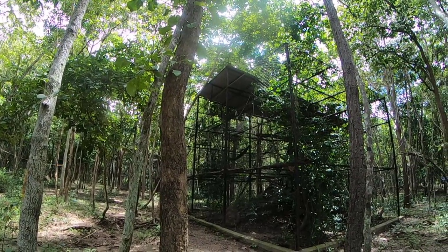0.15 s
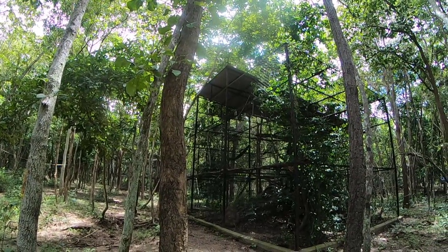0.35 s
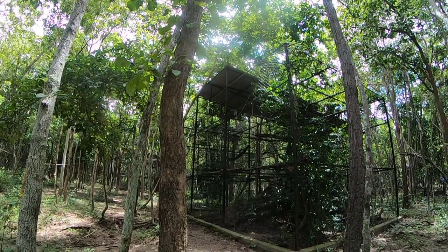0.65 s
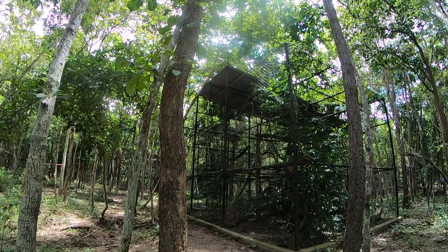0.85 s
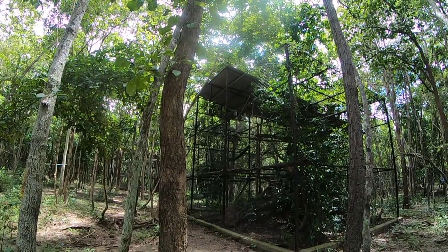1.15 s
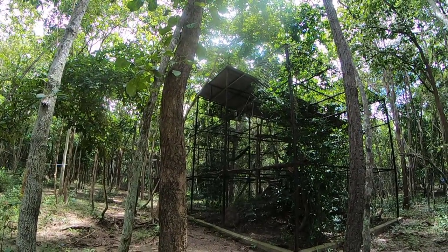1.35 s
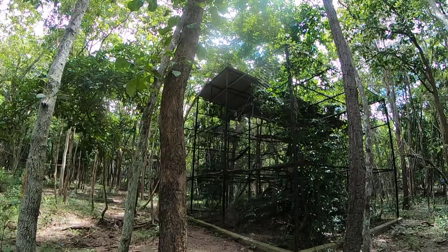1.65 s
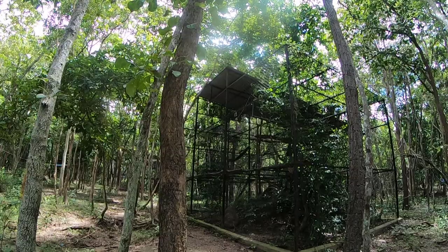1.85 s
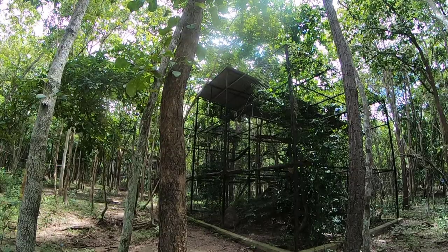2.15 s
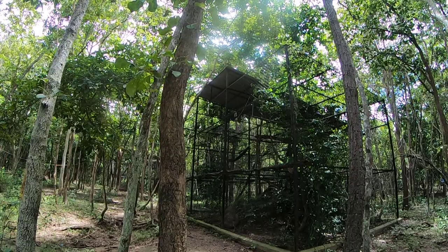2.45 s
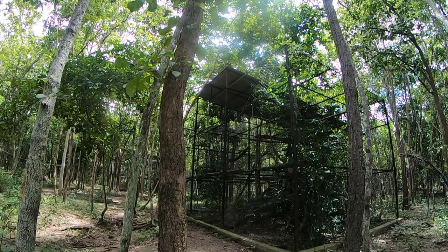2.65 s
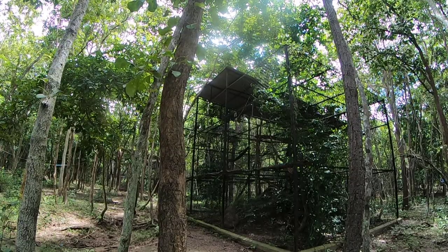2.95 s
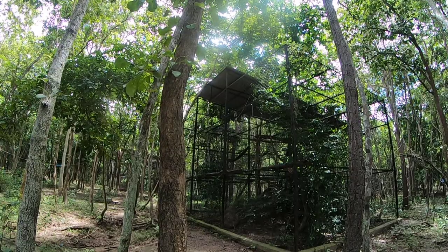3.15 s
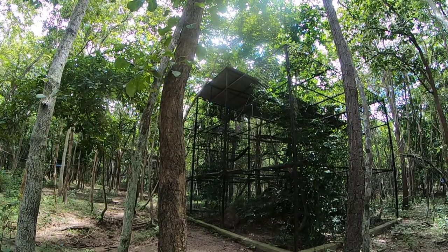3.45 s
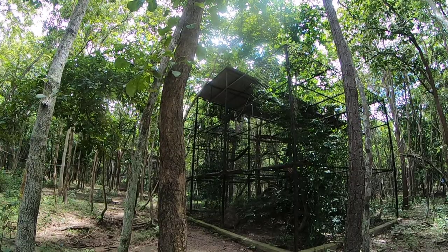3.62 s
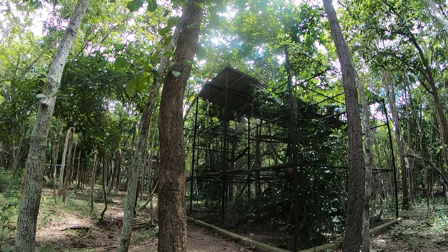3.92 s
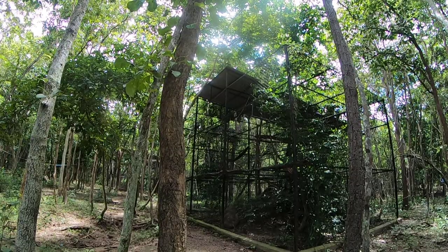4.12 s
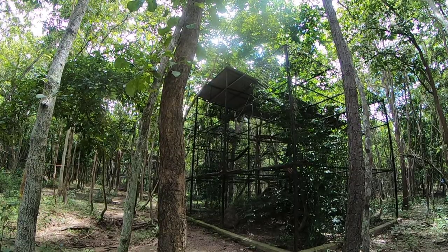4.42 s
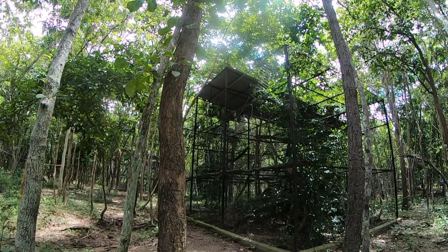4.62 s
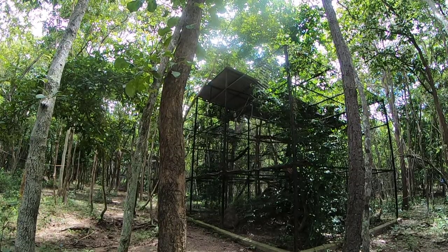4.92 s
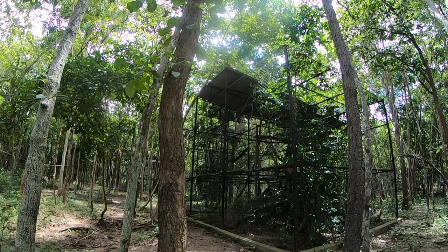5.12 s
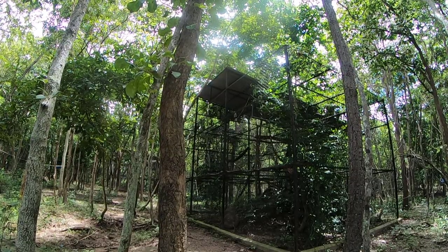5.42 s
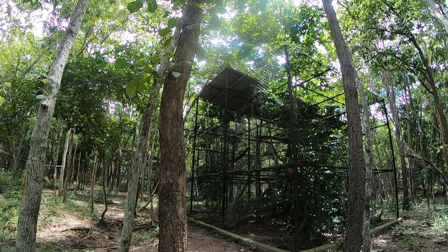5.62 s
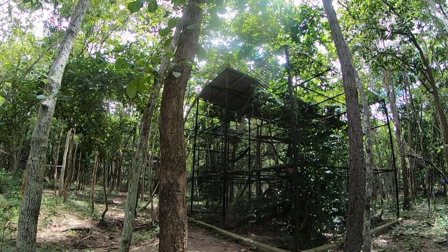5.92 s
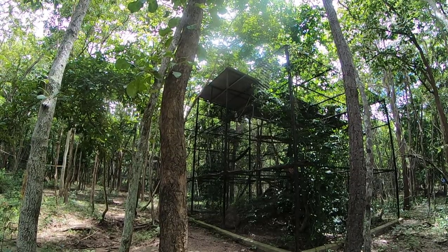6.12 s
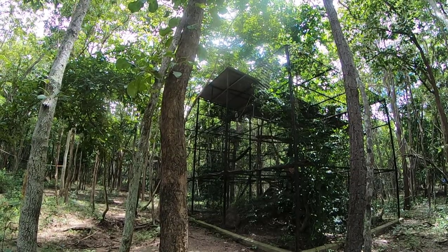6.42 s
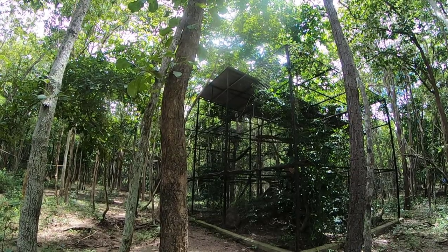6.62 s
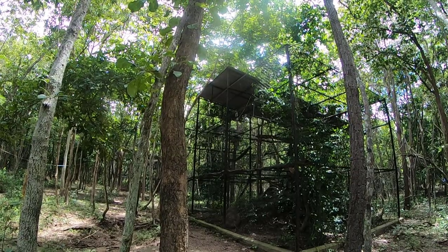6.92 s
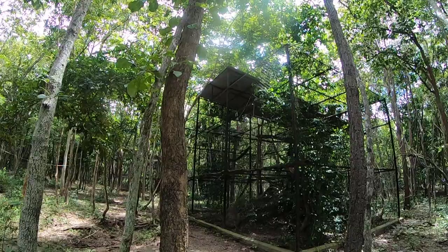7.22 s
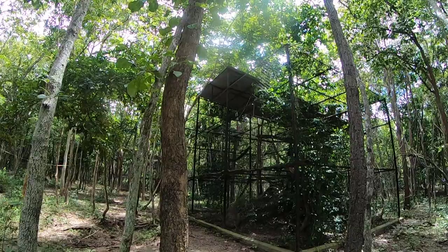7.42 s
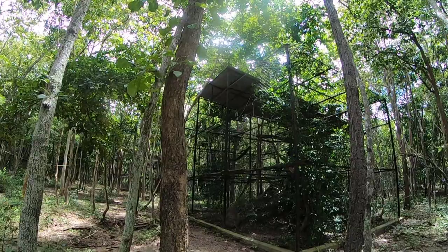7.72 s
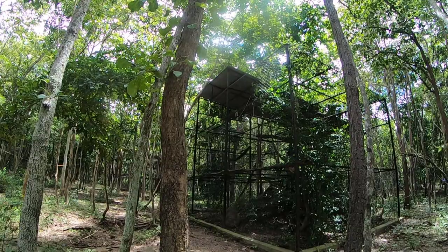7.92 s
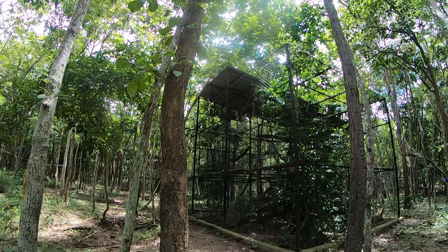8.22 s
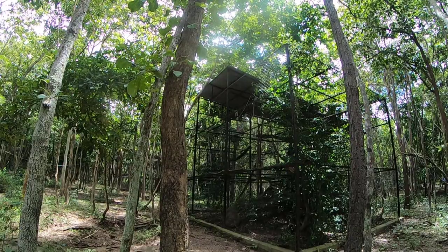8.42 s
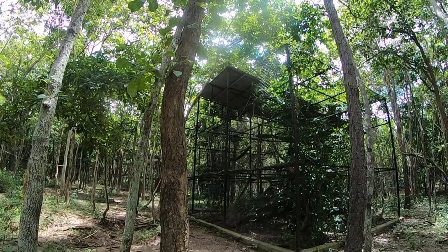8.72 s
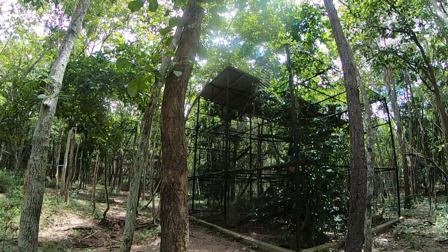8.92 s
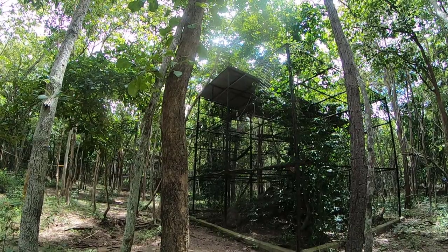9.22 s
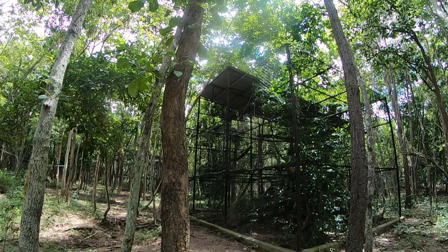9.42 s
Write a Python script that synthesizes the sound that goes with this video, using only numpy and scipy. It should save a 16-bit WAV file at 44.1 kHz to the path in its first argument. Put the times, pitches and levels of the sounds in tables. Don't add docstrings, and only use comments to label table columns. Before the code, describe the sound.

A gibbon's rapid bubbling whoops break into loud pure hoots and swoops in a forest, others answering, then sparse distant hoots over soft hiss.

```python
import sys
import numpy as np
from scipy import signal
from scipy.fft import rfft, irfft, next_fast_len
from scipy.io import wavfile
from scipy.ndimage import uniform_filter1d, minimum_filter1d

SR = 44100
rng = np.random.default_rng(int(sys.argv[2]) if len(sys.argv) > 2 else 0)


def dump(signal):
    limited = np.clip(np.atleast_2d(signal).T, -1, 1)
    pcm = np.round(limited * 32767).astype(np.int16)
    wavfile.write(sys.argv[1], SR, pcm)


def nominal_scale(level):
    x = np.asarray(level, float) / 20
    return 10 ** x


N = 421596
LEAD_IN = 30000
NEAR_LEFT_LEAD_S, FAR_LEFT_LEAD_S = 0.00003, 0.00025

# peak_s, peak_db, pitch_hz
NEAR_TRILL = [(0.02, -1.5, 772.6), (0.101, -2, 788.4), (0.181, -1, 788), (0.267, -3.5, 764.4),
              (0.351, -3, 765), (0.436, -3, 761.7), (0.522, -4, 779), (0.609, -18.5, 847),
              (0.752, -14.5, 817)]
# from_onset_s, pitch_ratio, level_db
NEAR_WHOOP = [(-.022, .58, -40), (-.007, .82, -28), (.001, .92, -7), (.008, 1.01, -1), (.015, 1.1, -6),
              (.022, 1.2, -20), (.032, 1.33, -36)]
NEAR_TRILL_VOICE = (-4.5, -19.5, -43, -2, -8.5)


def near_trill(place, breath):
    period_s = 0.064
    first_s, *first = NEAR_TRILL[0]
    earlier = [(first_s - k * period_s, *first) for k in range(1, 8)]
    sing_trill(place, earlier + NEAR_TRILL, NEAR_WHOOP, NEAR_TRILL_VOICE, breath)


# length_share, pitch_ratio, level_db
NEAR_ARCH = [(0, .77, -9), (.23, .955, -1), (.5, .99, -2), (.68, 1, -.5), (.82, .96, 2.5), (1, .75, -12)]
WIDE_ARCH = [(0, .51, -32.5), (.2, .75, -10.5), (0.382, .91, 1.5), (0.619, 1.0, -4), (.8, .9, 4.5),
             (.94, .73, -10.5), (0.998, .49, -15)]
SWOOP = [(0, .73, -22), (.13, .955, -2.5), (.32, 1, 1.5), (.53, .925, -1.5), (.69, .83, -9),
         (.83, .52, -41), (1, .37, -47)]
RISE = [(0, .76, -27.5), (.25, .91, -6.5), (.6, 1.002, .6), (1, .985, -6.5)]
HELD = [(0, .82, -26), (.09, .99, -.5), (.45, 1.01, 1), (.7, .955, -3.5), (.79, .99, -6), (.89, 1.15, -9),
        (1, 1.27, -9)]
# start_s, length_s, pitch_hz, level_db, swell_db
NEAR_ARCHES = [(.64, 0.09, 1277, -14, -4), (.81, 0.097, 1271, -14, 7), (1.188, 0.16, 1325, -14, 4.2),
               (1.93, .136, 1329, -12.5, 0.8), (2.645, 0.13, 1283, -11.5, 3.1)]
CLIMAX = [(3.695, .17, 1353, -10.5, .5)]
SWOOPS = [(1.627, .225, 912, -8.5, 6.5), (2.3, 0.21, 908, -7, 2), (3.087, .18, 899.3, -8, -2.5)]
NEAR_RISES = [(1.975, .115, 861, -17.5, 12)]
NEAR_HELD = [(.925, .225, 806.5, -5, -5)]
NEAR_HIGH_VOICE = (-9, -13.5, -25, -6.5, 7)
NEAR_LOW_VOICE = (-5, -10, -28, -5.5, 3)
NEAR_RISE_VOICE = (-4, -29.5, -27, -4.5, -0.5)
NEAR_HELD_VOICE = (-3, -13.5, -38, -8.5, -2)


def near_hoots(place, breath):
    sing_notes(place, NEAR_ARCHES, NEAR_ARCH, NEAR_HIGH_VOICE, breath)
    sing_notes(place, CLIMAX, WIDE_ARCH, NEAR_HIGH_VOICE, breath)
    sing_notes(place, SWOOPS, SWOOP, NEAR_LOW_VOICE, breath)
    sing_notes(place, NEAR_RISES, RISE, NEAR_RISE_VOICE, breath)
    sing_notes(place, NEAR_HELD, HELD, NEAR_HELD_VOICE, breath)


# length_share, pitch_ratio, level_db
FAR_ARCH = [(0, .85, -42), (.26, .985, -3.5), (.52, 1, .5), (.74, .95, 0), (.86, .87, -11), (1, .73, -34)]
WAVER = [(0, .91, -13), (.3, 1.01, .5), (.62, .97, -.5), (1, 1.025, -5)]
SAG = [(0, .89, -13), (.22, 1, -.5), (.6, .975, .5), (.82, .935, -1.5), (1, .92, -8)]
UPTURN = [(0, .94, -32), (.14, 1, -3.5), (.55, .99, 0), (.78, 1.03, .5), (1, 1.09, -16)]
# start_s, length_s, pitch_hz, level_db, swell_db
FAR_ARCHES = [(0.036, 0.068, 1392, -24.5, -3), (2.955, 0.13, 1449, -12, -0.5),
              (3.665, 0.19, 1436, -17, 5.5)]
WAVERS = [(.37, .15, 905, -21, -1.8), (2.125, 0.13, 998, -15, 2.5), (2.71, .125, 1019, -14, -2)]
SAGS = [(1.46, 0.16, 869, -25, 6.5), (1.515, .135, 981, -17.5, 5), (3.33, .19, 983.4, -16.5, -2.5)]
CLOSING_ARCHES = [(5.891, .125, 1445, -13, 9), (7.045, .145, 1400, -12.5, -2),
                  (8.225, .14, 1413, -11.5, 2.5)]
FAR_RISES = [(4.61, .11, 1293, -18.5, -12.5)]
FAR_HELD = [(.64, .23, 861, -16, 2.5)]
UPTURNS = [(6.585, .176, 767.6, -23.5, 7.7), (7.655, .176, 799.8, -23.5, 3.5)]
FAR_HIGH_VOICE = (6.5, -15.5, -38.5, -2.5, 1.5)
FAR_LOW_VOICE = (6.5, -21.5, -43, -1, 5)
CLOSING_VOICE = (11.5, -19.5, -42.5, -8.5, 0.5)
ASIDE_VOICE = (24, -34, -46.5, -6.5, -7)
FAR_HELD_VOICE = (12.5, -18.5, -32, -8, 0.3)
UPTURN_VOICE = (7, -23.5, -45.5, 2, -0.5)


def far_hoots(place, breath):
    sing_notes(place, FAR_ARCHES, FAR_ARCH, FAR_HIGH_VOICE, breath)
    sing_notes(place, WAVERS, WAVER, FAR_LOW_VOICE, breath)
    sing_notes(place, SAGS, SAG, FAR_LOW_VOICE, breath)
    sing_notes(place, CLOSING_ARCHES, FAR_ARCH, CLOSING_VOICE, breath)
    sing_notes(place, FAR_RISES, RISE, ASIDE_VOICE, breath)
    sing_notes(place, FAR_HELD, HELD, FAR_HELD_VOICE, breath)
    sing_notes(place, UPTURNS, UPTURN, UPTURN_VOICE, breath, bend_per_db=0.19)


# peak_s, peak_db, pitch_hz
FAR_TRILL = [(4.016, -31, 887), (4.136, -13, 829), (4.244, -20, 714), (4.335, -14, 824), (4.42, -11.5, 820),
             (4.507, -14, 821.4), (4.593, -16, 830), (4.685, -21, 789.5), (4.765, -27, 823),
             (4.852, -18, 780.6), (4.94, -14.5, 844), (5.03, -11.5, 826), (5.121, -15, 841),
             (5.203, -14.5, 788), (5.304, -18.5, 786), (5.389, -24, 779.7)]
# from_onset_s, pitch_ratio, level_db
FAR_WHOOP = [(-.026, .66, -27), (-.014, .77, -15), (-.002, .91, -11), (.004, 1.0, 1), (.01, 1.07, -9),
             (.02, 1.2, -22)]
FAR_TRILL_VOICE = (8.5, -26, -40.5, 4.5, -8)


def far_trill(place, breath):
    sing_trill(place, FAR_TRILL, FAR_WHOOP, FAR_TRILL_VOICE, breath)


# start_s, length_s, pitch_hz, level_db, swell_db
CRIES = [
    (1.06, 0.13, 1706, -19.5, 3),
    (1.79, 0.19, 1630, -16.5, .5),
    (2.41, .17, 1663, -13.5, 2.4),
]
# length_share, pitch_ratio, level_db
DROOP = [(0, .9, -18), (.2, .995, -12), (.4, .985, -3), (.65, .925, 1.5), (.83, .855, 4.5), (1, .775, -6)]
CRY_VOICE = (3, -19, -44, -8, -6)


def young_cries(place, breath):
    sing_notes(place, CRIES, DROOP, CRY_VOICE, breath)


# start_s, length_s, from_hz, to_hz, level_db
MURMURS = [(.7, 0.091, 648, 668, -42), (1.25, .16, 285, 280, -61), (3.075, 0.21, 539, 400, -53.5),
           (3.865, 0.033, 610, 433, -49.5), (6.785, 0.032, 1240, 1060, -44), (7.81, .06, 677, 400, -53)]
MURMUR_VOICE = (1.5, -17.5, -35.5, -11.5, -3)


def murmurs(place, breath):
    for start_s, length_s, from_hz, to_hz, level_db in MURMURS:
        edge_db = level_db - 4.5
        rows = [(start_s, from_hz, edge_db),
                (start_s + length_s / 2, (from_hz + to_hz) / 2, level_db),
                (start_s + length_s, to_hz, edge_db)]
        sing(place, rows, MURMUR_VOICE, breath)


def sing_trill(place, pulses, whoop, voice, breath):
    for peak_s, peak_db, pitch_hz in pulses:
        rows = [(peak_s + from_s, pitch_hz * ratio, peak_db + db) for from_s, ratio, db in whoop]
        sing(place, rows, voice, breath)


def sing_notes(place, events, shape, voice, breath, bend_per_db=None):
    for start_s, length_s, pitch_hz, level_db, swell_db in events:
        bend = bend_per_db * swell_db if bend_per_db else 1
        rows = [(start_s + share * length_s, pitch_hz * ratio ** bend, level_db + db + swell_db * (share - 0.5))
                for share, ratio, db in sorted(shape)]
        sing(place, rows, voice, breath)


# frequency_hz, near_db, far_db
MOUTH = [(1270, -3.5, 8.5), (1780, -0.3, -2.8), (1920, 3.9, 5.5), (2466, 1.6, 10.5), (2950, -9, -8.5),
         (3330, 2.5, -4), (4000, -9, 1.3)]
# frequency_hz, near_db, far_db
UPPER = [(2000, -37.5, -48.5), (3700, -40.5, -47), (3920, -54, -32.5), (4540, -53.5, -50.5),
         (6300, -46, -40), (6570, -53.5, -46.5), (7860, -64, -63.5), (9600, -69, -64), (11000, -84, -80.5)]


def sing(place, rows, voice, breath):
    left_right_db, second_db, third_db, scatter_db, upper_db = voice
    s, hz, db = np.transpose(rows)
    at = np.arange(round((s[0] - 0.008) * SR), round((s[-1] + 0.01) * SR))
    t = at / SR
    pitch_hz = rounded(np.interp(t, s, hz), min(len(t) // 8, 600))
    edge = np.clip(np.minimum(t - t[0], t[-1] - t) / 0.012, 0, 1)
    level = rounded(nominal_scale(np.interp(t, s, db)), min(len(t) // 20, 350)) * edge ** 2
    phase = 2 * np.pi * np.cumsum(pitch_hz) / SR
    singer_column = 2 if left_right_db > 0 else 1

    overtones = 0
    for k, harmonic_db in ((2, second_db), (3, third_db)):
        mouth_db = at_hz(MOUTH, k * pitch_hz, singer_column)
        overtones = overtones + nominal_scale(harmonic_db + mouth_db) * np.sin(k * phase)
    for k in range(4, 14):
        level_k = nominal_scale(upper_db + at_hz(UPPER, k * pitch_hz, singer_column))
        overtones = overtones + level_k * np.sin(k * phase + k * k) * (k * pitch_hz < 12000)
    flutter_db, flutter_per_s = 4, 70
    overtones = overtones * nominal_scale(flutter_db * drift(len(t), flutter_per_s))

    full_turn_drop, dull_db, turned_scatter_db = 0.1, 3, 2.5
    pitch_drop = 1 - pitch_hz / np.maximum.accumulate(pitch_hz)
    turn = np.minimum(pitch_drop / full_turn_drop, 1)
    core = np.sin(phase) + nominal_scale(-40.5) * breath[at + LEAD_IN]
    direct = level * (core + overtones * nominal_scale(-dull_db * turn))
    scatter = level * (core + overtones) * nominal_scale(scatter_db + turned_scatter_db * turn)
    left_power = 1 / (1 + nominal_scale(-2 * left_right_db))
    feeds = np.array([np.sqrt(left_power) * direct, np.sqrt(1 - left_power) * direct, scatter])
    place[:, at + LEAD_IN] += np.sqrt(2) * feeds


# frequency_hz, density_db
BREATH = [(300, -20.5), (900, -7), (2000, -3.5), (4000, -12.5), (7000, -30.5), (11000, -41.5)]


def breath_noise():
    return coloured(rng.standard_normal(next_fast_len(N + LEAD_IN)), BREATH)


# frequency_hz, t60_s, level_db
TREES = [(400, 1.065, 3.5), (835, 1.016, 1.5), (1400, 1.017, 5.5), (2400, 0.81, 10), (4200, 0.93, 8),
         (8750, 0.11, 11)]


def trees():
    t = np.arange(int(1.4 * SR)) / SR
    build_up_s, shared = 0.0033, 0.29
    white, out = rng.standard_normal((2, len(t))), 0
    white[1] = shared * white[0] + np.sqrt(1 - shared ** 2) * white[1]
    edges_hz = 250 * 2 ** np.arange(0, 6, 2 / 3)
    for low_hz, high_hz in zip(edges_hz, edges_hz[1:]):
        band = signal.sosfilt(signal.butter(2, [low_hz, high_hz], "band", fs=SR, output="sos"), white)
        center_hz = np.sqrt(low_hz * high_hz)
        t60_s = at_hz(TREES, center_hz)
        decay_db = at_hz(TREES, center_hz, column=2) - 60 * t / t60_s
        out = out + band * nominal_scale(decay_db) / np.sqrt(t60_s * SR / 14)
    return out * (1 - np.exp(-t / build_up_s))


def with_echo(response):
    delay_s, blur_s, left_db, right_db = 0.035, 0.05, 3.5, -2.5
    t = np.arange(response.shape[1]) / SR
    envelope = np.exp(-((t - delay_s) / blur_s) ** 2) / np.sqrt(blur_s * SR)
    burst = rng.standard_normal(len(t)) * envelope
    return response + np.outer(nominal_scale([left_db, right_db]), burst)


def heard(place, response, left_lead_s):
    size = next_fast_len(place.shape[1] + response.shape[1])
    hz = np.fft.rfftfreq(size, 1 / SR)
    sound = rfft(place[:2], size) + rfft(place[2], size) * rfft(response, size)
    delay = np.exp(-2j * np.pi * np.outer([0, left_lead_s], hz))
    return irfft(sound * delay, size)[:, LEAD_IN:LEAD_IN + N]


# start_s, peak_db, pitch_hz, left_right_db, t60_s
THUMPS = [
    (4.409, -44, 179, 15, 0.14),
    (5.31, -35.5, 186, -9, 0.077),
    (5.513, -34.5, 77, 1.0, 0.14),
    (5.967, -35.5, 159.9, 12.5, 0.083),
    (7.778, -22.5, 200, 8, 0.069),
    (9.025, -48, 58.7, 11, 0.13),
]
# start_s, peak_db
TICKS = [(5.5897, -51.5), (7.4508, -52.5), (7.5582, -53.5)]


def knocks():
    out, t = np.zeros((2, N)), np.arange(int(0.25 * SR)) / SR
    for start_s, peak_db, pitch_hz, left_right_db, t60_s in THUMPS:
        if pitch_hz > 100:
            shape = (1 - np.exp(-t / 0.0074)) ** 2 * nominal_scale(-60 * t / t60_s)
            cycles = pitch_hz * (0.67 * t + 0.011 * (1 - np.exp(-t / 0.007)))
            ports = [1, -1]
        else:
            shape = np.exp(-((t - 0.03) / (t60_s / 4)) ** 4)
            cycles, ports = pitch_hz * t, [1, 1]
        thump = shape / shape.max() * np.sin(2 * np.pi * cycles)
        port_levels = nominal_scale(peak_db + np.array([left_right_db, -left_right_db]) / 2) * ports
        out[:, round(start_s * SR):][:, :len(t)] += np.outer(port_levels, thump)
    for start_s, peak_db in TICKS:
        tick = np.diff(rng.standard_normal((2, len(t) + 1))) * nominal_scale(peak_db - 5 - 60 * t / 0.015)
        out[:, round(start_s * SR):][:, :len(t)] += tick
    return out


# time_s, level_db
RUSTLE = [(0, -67), (1.202, -65), (1.399, -69.5), (3.03, -61), (3.401, -70.5), (3.999, -63), (4.85, -72.5),
          (6.199, -75), (7.8, -74), (9.56, -78.5)]


def rustle():
    band = signal.butter(2, (4900, 8860), "band", fs=SR, output="sos")
    hiss = rms_one(signal.sosfilt(band, rng.standard_normal((2, N))))
    return hiss * nominal_scale(np.interp(np.arange(N) / SR, *np.transpose(RUSTLE)) + 5)


# frequency_hz, density_db
FOREST = [(25, -2.5), (60, -8.5), (100, -26.5), (150, -8.5), (220, -15.5), (374, -23.5), (538, -29.5),
          (680, -19.5), (1520, -23), (2300, -23), (5880, -34), (7240, -52), (9640, -41.5), (12500, -59.5)]
# frequency_hz, shared_ratio
LIKENESS = [(60, -.25), (130, -0.014), (250, 0.45), (800, -0.17), (3000, 0.27), (7000, 0.33),
            (12000, -0.88)]


def forest_hiss():
    size = next_fast_len(N)
    hz = np.fft.rfftfreq(size, 1 / SR) + 1
    alike = at_hz(LIKENESS, hz)
    mid, side = rfft(rng.standard_normal((2, size))) * [np.sqrt(1 + alike), np.sqrt(1 - alike)]
    right_delay = np.exp(-2j * np.pi * hz * FAR_LEFT_LEAD_S)
    ports = irfft(np.array([mid + side, (mid - side) * right_delay]), size)
    hiss = coloured(ports, FOREST)[:, :N]
    hiss = signal.sosfilt(signal.butter(2, 75, "high", fs=SR, output="sos"), hiss)
    return hiss * nominal_scale(-51 + 0.8 * drift(N, 5.2))


# time_s, over_calm_db
GUSTS = [(.32, 6), (.75, 9), (1.05, 15.5), (1.299, 11.5), (2.31, 3.5), (3.03, 5.5), (3.86, 4), (4.15, 7.5),
         (4.47, 6), (5.3, 14), (5.55, 13), (6.05, 13), (6.6, 7), (7.05, 5), (7.801, 15.5), (8.63, 6),
         (9.1, 12), (9.5, 10.5)]


def wind():
    t = np.arange(N) / SR
    gust_db = np.max([db * np.exp(-((t - time_s) / 0.13) ** 2) for time_s, db in GUSTS], axis=0)
    band = signal.butter(2, [14, 62], "band", fs=SR, output="sos")
    rumble = signal.sosfilt(band, rng.standard_normal((2, N)))
    rumble = rms_one(rumble * nominal_scale(1.3 * np.array([drift(N, 3.3), drift(N, 3)])))
    return rumble * nominal_scale(-59 + gust_db)


# time_s, gain_db
GAIN = [(0, -4), (.4, -2.5), (1.4, -6), (2.4, -3.5), (3.8, 2), (4.4, 3), (5.5, 1.5), (9.56, -.5)]


def background():
    gain_db = np.interp(np.arange(N) / SR, *np.transpose(GAIN))
    return (forest_hiss() + wind()) * nominal_scale(gain_db) * nominal_scale([[1.5], [-1.5]])


def rms_one(x):
    return x / np.sqrt(np.mean(x ** 2) + 1e-20)


def at_hz(points, hz, column=1):
    points = np.array(points)
    return np.interp(np.log(hz), np.log(points[:, 0]), points[:, column])


def coloured(white, spectrum):
    hz = np.fft.rfftfreq(white.shape[-1], 1 / SR) + 1
    return rms_one(irfft(rfft(white) * nominal_scale(at_hz(spectrum, hz)), white.shape[-1]))


def drift(size, rate_hz):
    knots = rng.standard_normal(2000)
    curve = np.interp(np.arange(size) / SR * rate_hz, np.arange(len(knots)), knots)
    return uniform_filter1d(curve, int(SR / rate_hz / 2))


def rounded(curve, size):
    once = uniform_filter1d(curve, size, mode="nearest")
    return uniform_filter1d(once, size, mode="nearest")


def scene():
    near, far, trilling = np.zeros((3, 3, N + LEAD_IN))
    breath = breath_noise()
    near_trill(near, breath)
    near_hoots(near, breath)
    far_hoots(far, breath)
    far_trill(trilling, breath)
    young_cries(far, breath)
    murmurs(far, breath)
    by_near, by_far = trees(), trees()
    song = heard(near, by_near, NEAR_LEFT_LEAD_S)
    song += heard(trilling, by_near, FAR_LEFT_LEAD_S)
    song += heard(far, with_echo(by_far), FAR_LEFT_LEAD_S)
    return song + knocks() + rustle() + background()


def low_pass(x):
    return signal.sosfilt(signal.butter(12, 12740, fs=SR, output="sos"), x)


def record(dry):
    limit, hold_samples, fade_samples = 0.86, 700, 120
    needed = np.minimum(1, limit / (np.abs(dry).max(axis=0) + 1e-9))
    gain = uniform_filter1d(minimum_filter1d(needed, hold_samples), hold_samples)
    gain = gain * np.minimum(np.arange(N) / fade_samples, 1)
    return low_pass(dry * gain)


dry = scene()
out = record(dry)
dump(out)
```